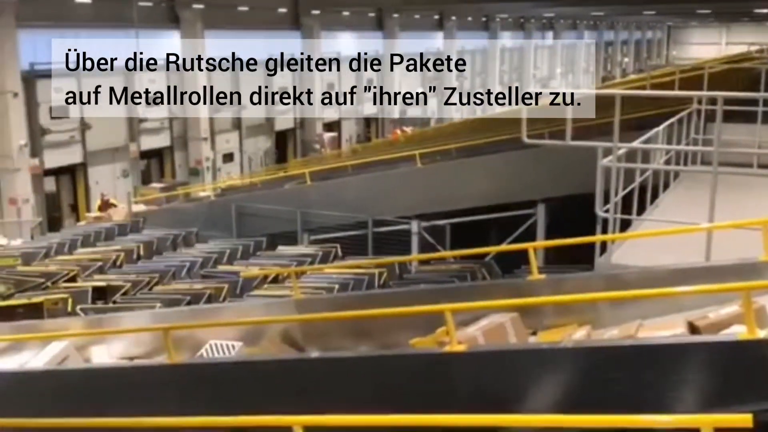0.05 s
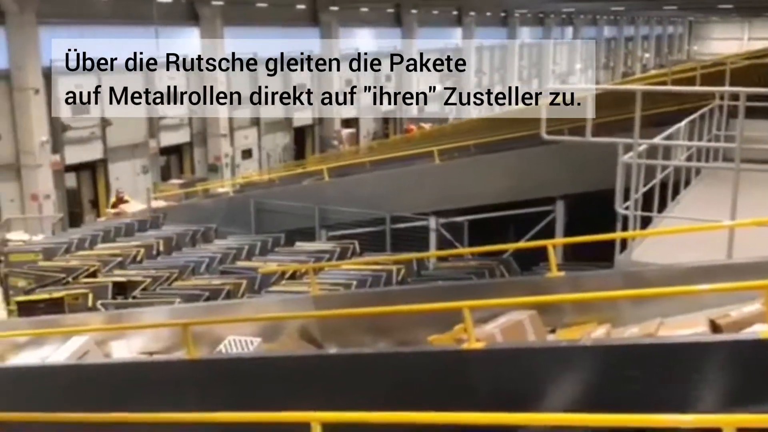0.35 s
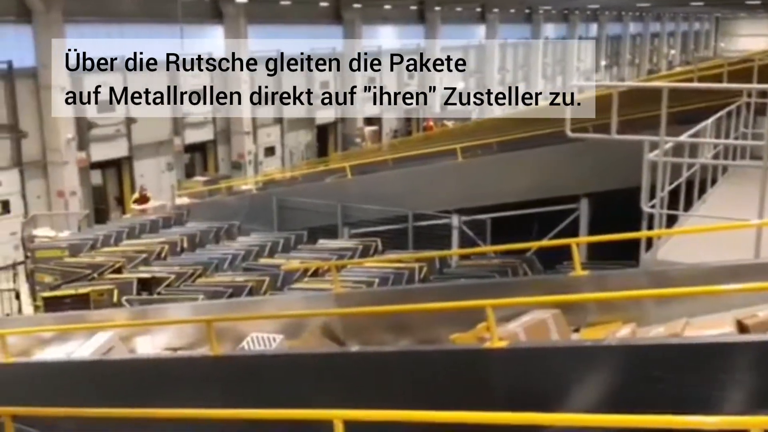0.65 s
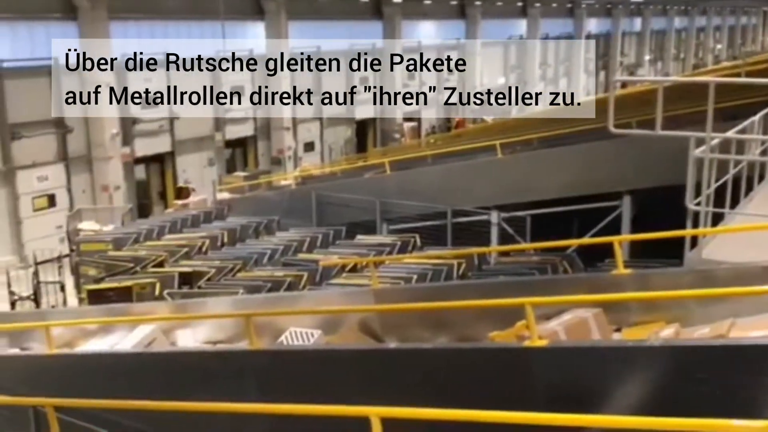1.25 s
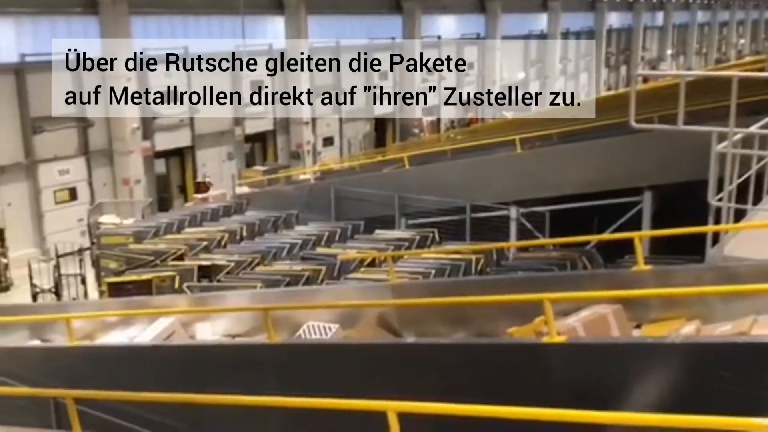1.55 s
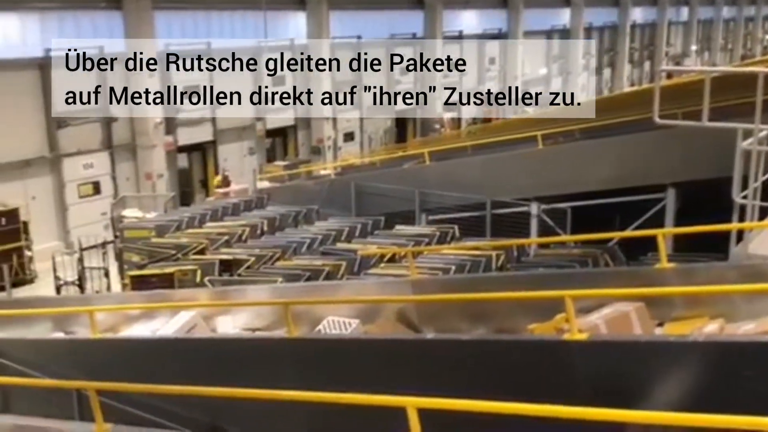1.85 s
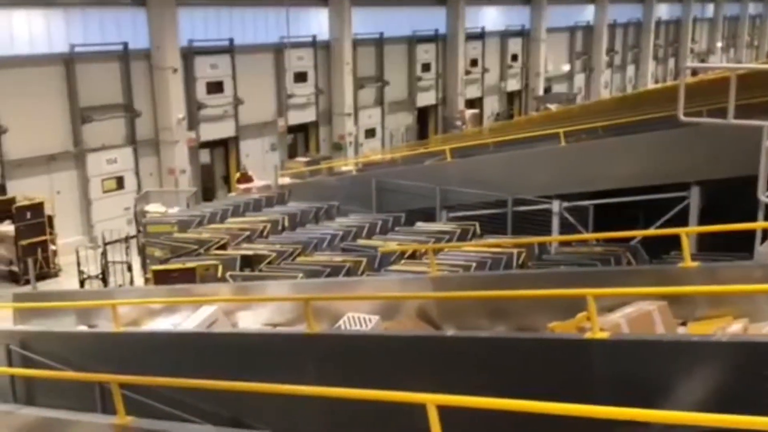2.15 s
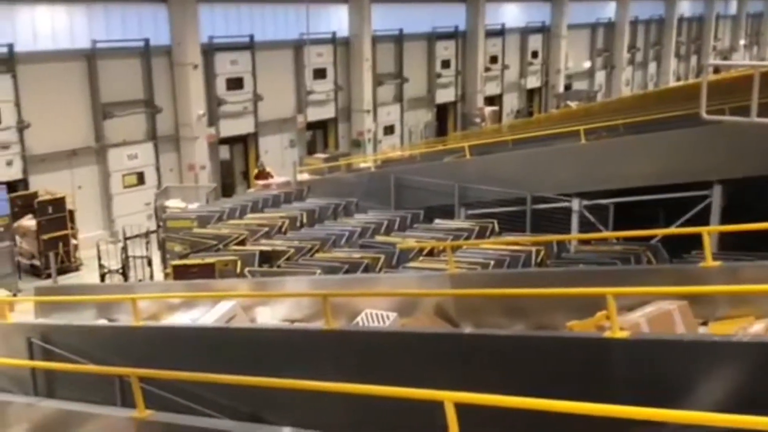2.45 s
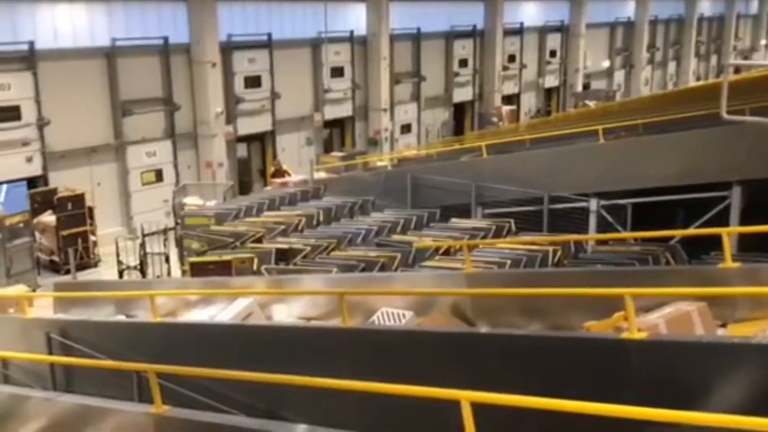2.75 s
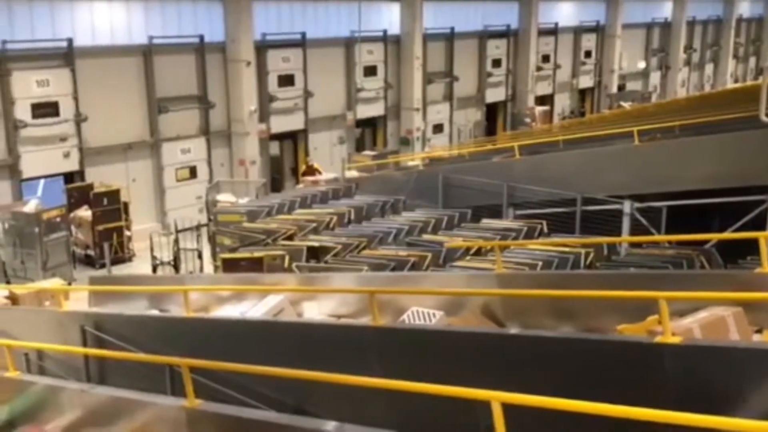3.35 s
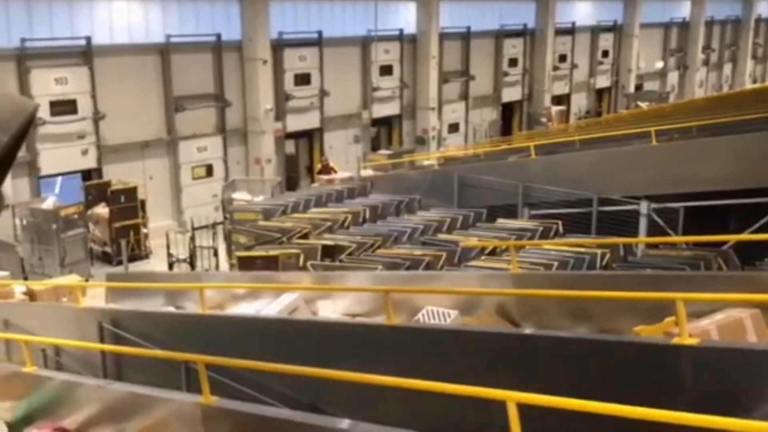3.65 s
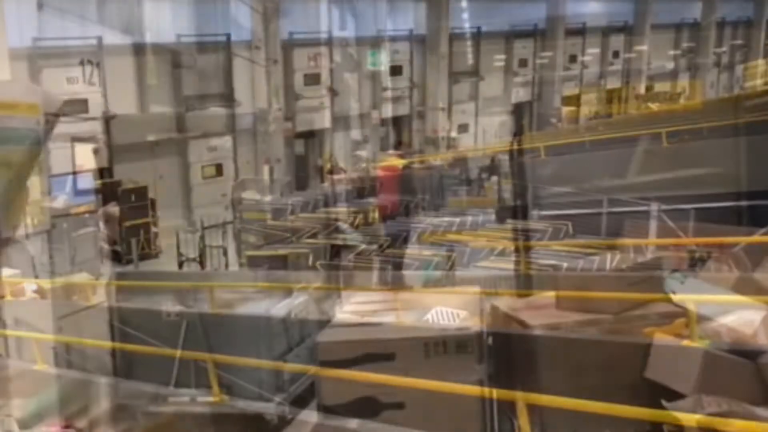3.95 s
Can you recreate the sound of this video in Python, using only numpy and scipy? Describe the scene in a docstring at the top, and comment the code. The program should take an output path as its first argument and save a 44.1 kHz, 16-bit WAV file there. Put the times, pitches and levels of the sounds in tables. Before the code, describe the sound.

Parcel conveyors rumble and hum steadily in a large hall, their rollers whining and squeaking.

```python
"""Parcel conveyors run steadily in a large sorting hall.
Belts rumble, steel frames drone, drive motors hum and gears add faint tones.
Many rollers whine together near 2 kHz, beating in and out, their overtones swelling into short squeaks.
Sliding parcels add a soft hiss; the machinery sinks a little at the end."""
import sys
import numpy as np
from scipy import signal
from scipy.fft import rfft, irfft
from scipy.io import wavfile
from scipy.ndimage import uniform_filter1d

SR = 44100
rng = np.random.default_rng(int(sys.argv[2]) if len(sys.argv) > 2 else 0)


def unload_wav(signal):
    """Save mono or channel-first audio to the path in sys.argv[1] as 16-bit WAV at rate SR, clipped to [-1, 1]."""
    wavfile.write(
        sys.argv[1],
        SR,
        np.round(np.clip(np.atleast_2d(signal).T, -1, 1) * 32767).astype(np.int16),
    )


N = 176400
TIME_S = np.arange(N) / SR


def from_db(db):
    """Decibels to gain."""
    return 10 ** (np.asarray(db) / 20)


def unit_rms(x):
    """Scale to rms 1."""
    return x / np.sqrt(np.mean(np.abs(x) ** 2) + 1e-20)


def envelope(rows):
    """Gain over time from (time [s], level [dB]) rows."""
    times_s, db = np.transpose(rows)
    return from_db(np.interp(TIME_S, times_s, db))


def coloured_noise(spectrum):
    """Noise shaped by (frequency [Hz], level [dB]) rows, rolling off outside them; rms 1."""
    hz, db = np.transpose(spectrum)
    bins_hz = np.maximum(np.arange(N // 2 + 1) * SR / N, 1)
    skirt = np.minimum(bins_hz / hz[0], 1) * np.minimum(hz[-1] / bins_hz, 1) ** 2
    shape = from_db(np.interp(np.log(bins_hz), np.log(hz), db))
    return unit_rms(irfft(rfft(rng.standard_normal(N)) * skirt * shape, N))


def slow_noise(width_hz):
    """Complex narrowband noise around 0 Hz; rms 1."""
    bins_hz = (np.arange(N) - N // 2) * SR / N
    shape = np.fft.ifftshift(1 / (1 + (2 * bins_hz / width_hz) ** 2))
    real, imag = rng.standard_normal((2, N))
    return unit_rms(np.fft.ifft((real + 1j * imag) * shape))


def wander(rate_hz):
    """Random drift, mostly slower than rate_hz; rms 1."""
    return unit_rms(slow_noise(2 * rate_hz).real)


def beating_tone(hz, width_hz, evenness, even_s):
    """Many near-equal sources beat; evenness (0-1) flattens swings slower than even_s."""
    beats = slow_noise(width_hz)
    power = uniform_filter1d(np.abs(beats) ** 2, int(even_s * SR))
    beats = unit_rms(beats / power ** (evenness / 2))
    return np.sqrt(2) * np.real(beats * np.exp(2j * np.pi * hz * TIME_S))


# belt and frame rumble (frequency [Hz], relative density [dB])
RUMBLE_SPECTRUM = [(28, -31), (42, -19), (56, -5), (72, 4), (86, -2), (105, 0.5), (122, -2.5), (160, 0.5),
                   (205, 0.5), (250, -5.5), (295, 2.5), (335, -1.5), (380, -7), (480, -12), (530, -8.5),
                   (575, -2.5), (660, -8.5), (730, -12), (900, -15.5), (1250, -15), (1400, -21.5),
                   (1560, -17), (1750, -25.5), (2400, -49)]
# bearing and belt rush (frequency [Hz], relative density [dB])
RUSH_SPECTRUM = [(1200, -18), (1800, 3), (2300, 3), (2650, 1.5), (3100, 4), (3350, 0.5), (3600, 1),
                 (3850, -1.5), (4900, -2), (5500, -4), (5800, -9), (6400, -8.5), (7500, -18), (10000, -34)]


def belts(rumble_db=-34.5, rush_db=-47):
    """Running belts rumble low, with a brighter rush from belts and bearings."""
    rumble = from_db(rumble_db) * coloured_noise(RUMBLE_SPECTRUM)
    rush = from_db(rush_db) * coloured_noise(RUSH_SPECTRUM)
    return rumble + rush


# motor and gear tones (frequency [Hz], width [Hz], relative start level [dB], trend [dB/s])
GEAR_TONES = [(93.1, 1.2, -53, 1.5), (597.5, 3.2, -57, 1), (683, 2.7, -52.5, -0.6), (813.5, 1.7, -59, 0.9),
              (828, 2.2, -64.5, 1.8), (1028, 3.9, -59, -1), (1155, 1.9, -60.5, -0.3), (1314, 1.3, -62, -2),
              (1799, 1.1, -60, 0), (1823, 2.1, -56, -1.5), (1845, 1.3, -58, -2), (2962, 3, -59, -0.5),
              (3630, 50, -65, 0), (8000, 8, -77, -2)]


def gears(trim_db=-0.5):
    """Motors and gears across the hall give faint tones, most slowly growing or fading."""
    out = np.zeros(N)
    for hz, width_hz, start_db, db_per_s in GEAR_TONES:
        gain = from_db(trim_db + start_db + db_per_s * TIME_S)
        out += gain * beating_tone(hz, width_hz, evenness=0.76, even_s=0.59)
    return out


WHINE_HZ = 2012.8
# shimmer lines (multiple of WHINE_HZ, width [Hz], relative level [dB])
SHIMMER_LINES = [(1, 50, -46), (1.5, 24, -57.5), (2, 65, -48), (2.5, 110, -63), (3, 87, -59.5),
                 (3.5, 90, -76), (4, 31, -73.5), (4.5, 80, -82)]


def distant_rollers():
    """Distant rollers blend into a steady shimmer on half multiples of the whine."""
    return sum(from_db(db) * beating_tone(multiple * WHINE_HZ, width_hz, evenness=0.69, even_s=0.12)
               for multiple, width_hz, db in SHIMMER_LINES)


# drive hums (time [s], relative level [dB])
LOW_HUM_LEVEL = [(0, -41.5), (.33, -40.5), (.7, -44.5), (1.0, -40), (1.4, -47), (1.75, -44), (2.3, -39),
                 (2.62, -46), (3.05, -38.5), (3.45, -41), (4, -55)]
MID_HUM_LEVEL = [(0, -40.5), (.15, -37.5), (1.25, -38), (1.65, -49.5), (2.15, -40), (2.55, -46),
                 (2.85, -37.5), (3.5, -40), (3.75, -36), (4, -65)]
HIGH_HUM_LEVEL = [(0, -40.5), (.4, -46), (1.1, -33.5), (1.8, -43.5), (2.25, -40), (2.55, -39), (3.05, -36),
                  (3.48, -37), (3.7, -44), (4, -44.5)]


def drive_motors(wander_hz=1.16, trim_db=-1.93):
    """Three motor hums swell and fade, each wandering slightly in pitch."""
    out = np.zeros(N)
    for hz, rows in ((77.2, LOW_HUM_LEVEL), (277.7, MID_HUM_LEVEL), (342.8, HIGH_HUM_LEVEL)):
        pitch_hz = hz + wander_hz * wander(rate_hz=2.75)
        turns = np.cumsum(pitch_hz) / SR + rng.random()
        out += envelope(rows) * np.sqrt(2) * np.sin(2 * np.pi * turns)
    return from_db(trim_db) * out


# frame drones (time [s], level [dB])
LOW_DRONE_LEVEL = [(0, -55), (1.3, -52), (1.9, -47), (2.2, -37), (2.45, -48.5), (3.5, -44.5), (4, -49.5)]
HIGH_DRONE_LEVEL = [(0, -42), (.15, -37.5), (.45, -54), (.9, -45), (1.1, -39), (1.45, -61), (1.8, -37.5),
                    (2.0, -43.5), (2.2, -38), (2.42, -46.5), (2.65, -37.5), (2.85, -51), (3.45, -43),
                    (3.62, -62), (4, -54)]


def frames():
    """The steel frames drone in two broad, swelling bands."""
    drones = ((165.5, 25, LOW_DRONE_LEVEL), (326, 23, HIGH_DRONE_LEVEL))
    return sum(envelope(rows) * beating_tone(hz, width_hz, evenness=1, even_s=0.22)
               for hz, width_hz, rows in drones)


# sliding hiss and metallic sheen (frequency [Hz], relative density [dB])
HISS_SPECTRUM = [(5000, -8), (7000, -0.5), (7700, -1.5), (8050, -2), (8650, 3), (9000, 3), (9600, 2),
                 (11200, -2), (12500, -1.5), (15700, -5)]
SHEEN_SPECTRUM = [(7700, -25), (8020, 6), (8200, -10), (8430, 1), (8650, -15), (9020, 2), (9300, -12),
                  (10200, -12)]
# their swells (time [s], relative level [dB])
HISS_SWELLS = [(0, -54.5), (.6, -55), (.95, -53.5), (1.45, -52.5), (1.7, -54), (2.15, -54), (2.5, -55.5),
               (3.45, -56), (3.75, -59.5), (4, -59)]
SHEEN_SWELLS = [(0, -63), (1.1, -73), (1.38, -57), (1.68, -60), (1.95, -71), (2.5, -69), (3.15, -63),
                (3.5, -68), (4, -71)]


def parcels(flicker_db=0.7, hiss_trim_db=-0.4):
    """Cardboard hisses unevenly over metal, with a thin sheen as it crosses the rollers."""
    hiss_gain = from_db(hiss_trim_db + flicker_db * wander(rate_hz=5))
    hiss = hiss_gain * envelope(HISS_SWELLS) * coloured_noise(HISS_SPECTRUM)
    sheen = envelope(SHEEN_SWELLS) * coloured_noise(SHEEN_SPECTRUM)
    return hiss + sheen


def squeal(peak_s, multiple, db, length_s, whine_turns, spread_hz=2.96, scatter_turns=0.16):
    """One roller swells briefly on a multiple of the whine, slightly off pitch and out of step."""
    near = np.abs(TIME_S - peak_s) < 2 * length_s
    t = TIME_S[near] - peak_s
    detune_hz = spread_hz * rng.standard_normal()
    turns = multiple * (whine_turns[near] + detune_hz * t) + scatter_turns * rng.standard_normal()
    swell = 0.5 ** ((2 * t / length_s) ** 2)  # length_s wide at half height
    out = np.zeros(N)
    out[near] = from_db(db) * swell * np.sqrt(2) * np.sin(2 * np.pi * turns)
    return out


# whine bursts (peak time [s], relative level [dB], length [s])
WHINE_BURSTS = [(0.033, -34, 0.057), (0.142, -35.5, 0.048), (0.25, -30.5, 0.048), (0.303, -32, 0.045),
                (0.396, -34.5, 0.032), (0.463, -34, 0.024), (0.534, -36.5, 0.057), (.64, -33, 0.066),
                (.735, -46, 0.025), (0.842, -41, 0.041), (1.03, -39.5, 0.046), (1.083, -40, 0.043),
                (1.208, -37, .055), (1.275, -36, .035), (1.326, -32, 0.035), (1.482, -33, 0.033),
                (1.565, -33, .075), (1.663, -33.5, 0.049), (1.746, -34, 0.046), (1.866, -41, 0.13),
                (1.977, -32.5, 0.039), (2.021, -37, 0.017), (2.132, -34, 0.052), (2.203, -34.5, 0.039),
                (2.242, -36.5, 0.028), (2.307, -42, 0.027), (2.37, -40, 0.029), (2.485, -38, 0.053),
                (2.574, -35.5, 0.048), (2.733, -34.5, .11), (2.871, -35, 0.029), (2.944, -35, 0.012),
                (3.079, -31.5, 0.08), (3.212, -34.5, 0.062), (3.268, -37.5, .03), (3.325, -34.5, 0.036),
                (3.432, -36, 0.036), (3.525, -36.5, 0.042), (3.622, -36, 0.11), (3.742, -41, 0.03),
                (3.816, -42, 0.042), (3.88, -42, 0.033), (3.995, -35.5, 0.051)]
# overtone squeaks (peak time [s], multiple of WHINE_HZ, relative level [dB], length [s])
OVERTONE_SQUEAKS = [(.044, 3, -53, .03), (.11, 2, -40, 0.017), (0.289, 2, -45, 0.034),
                    (0.33, 2, -43.5, 0.042), (0.563, 2, -46, .06), (0.637, 2, -42, 0.035),
                    (0.637, 3, -54, .045), (1.006, 2, -36.5, 0.025), (1.213, 2, -45.5, 0.078),
                    (1.403, 2, -43.5, 0.088), (1.45, 3, -59, .05), (1.805, 2, -39.5, .04),
                    (1.89, 2, -50, 0.036), (1.9, 3, -49.5, 0.044), (1.995, 2, -44, 0.068),
                    (2.13, 2, -42.5, 0.061), (2.262, 2, -46, 0.018), (2.407, 2, -43, 0.021),
                    (2.481, 2, -45, .025), (2.603, 2, -43, 0.16), (2.692, 2, -40.5, 0.045),
                    (2.696, 3, -61, 0.15), (2.8, 2, -44, 0.049), (2.89, 2, -45, .04), (2.92, 3, -55, .05),
                    (3.043, 2, -38.5, 0.023), (3.12, 3, -54, 0.055), (3.159, 2, -46.5, .03),
                    (3.29, 2, -47, 0.11), (3.384, 2, -43, 0.11), (3.387, 3, -55, 0.13),
                    (3.515, 3, -54, 0.034), (3.637, 2, -40.5, 0.03), (3.744, 2, -43, 0.026)]


def rollers(wander_hz=4.51, whine_trim_db=-1, squeak_trim_db=-0.9):
    """Rollers whine in bursts and squeak on overtones, all following one wandering pitch."""
    turns = np.cumsum(WHINE_HZ + wander_hz * wander(rate_hz=25.2)) / SR
    whine = sum(squeal(peak_s, 1, db + whine_trim_db, length_s, turns)
                for peak_s, db, length_s in WHINE_BURSTS)
    squeaks = sum(squeal(peak_s, multiple, db + squeak_trim_db, length_s, turns)
                  for peak_s, multiple, db, length_s in OVERTONE_SQUEAKS)
    return whine + squeaks


# belts, gears and distant rollers together (time [s], gain [dB])
BED_GAIN = [(0, 1), (1, 0), (2.2, -0.13), (3.0, -0.5), (3.5, -0.5), (3.7, -1.8), (3.85, -3), (4, -5)]


def scene():
    """All the machinery in mono, heard from a walkway above it."""
    bed = envelope(BED_GAIN) * (belts() + gears() + distant_rollers())
    return (bed + drive_motors() + frames() + rollers() + parcels())[None]


def record(dry, cutoff_hz=15750):
    """A steep low-pass cuts the top treble."""
    return signal.sosfilt(signal.ellip(12, 0.1, 80, cutoff_hz, fs=SR, output="sos"), dry)


dry = scene()
out = record(dry)
unload_wav(out)
```